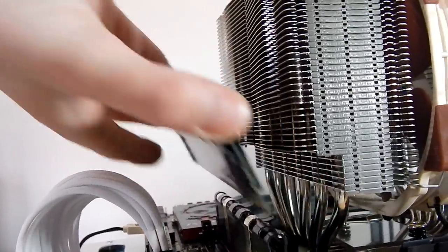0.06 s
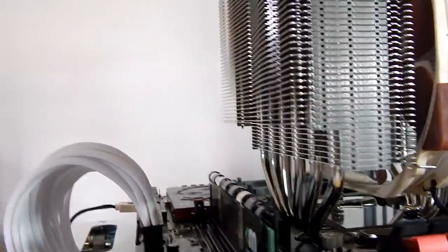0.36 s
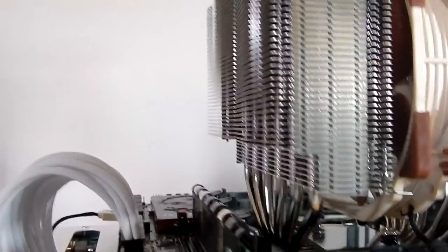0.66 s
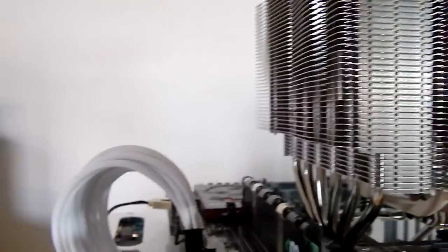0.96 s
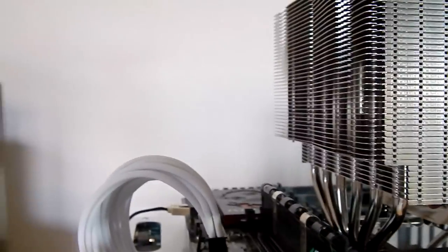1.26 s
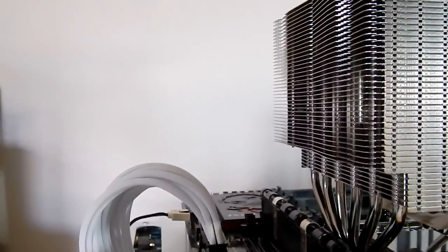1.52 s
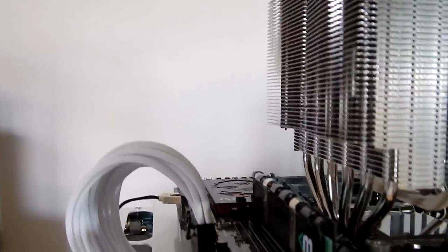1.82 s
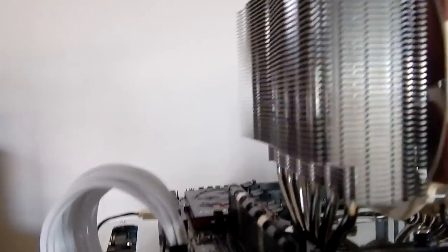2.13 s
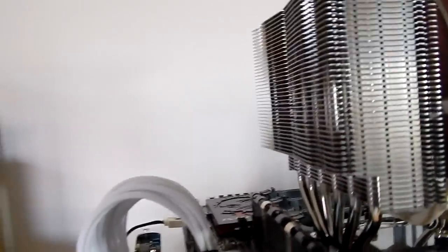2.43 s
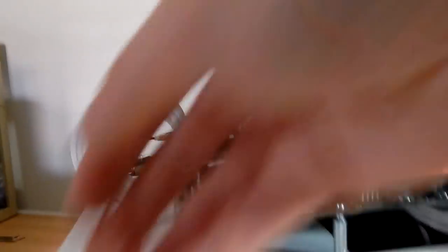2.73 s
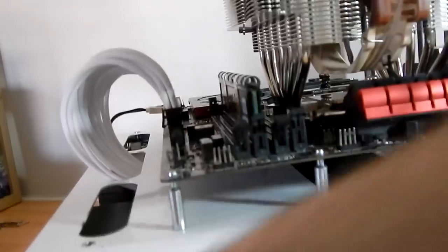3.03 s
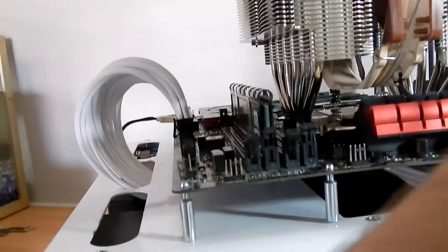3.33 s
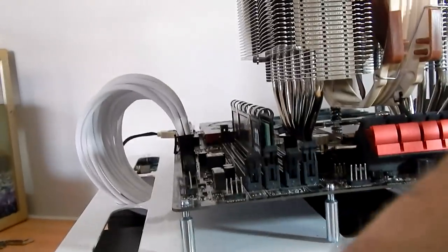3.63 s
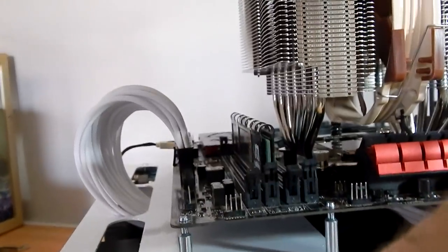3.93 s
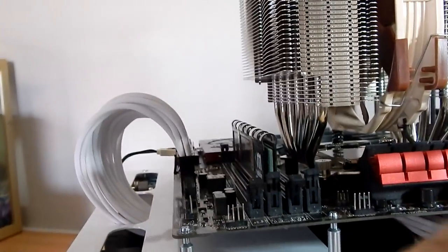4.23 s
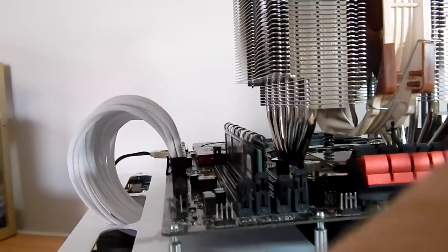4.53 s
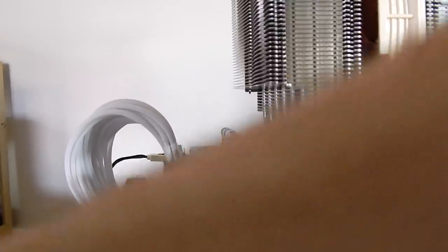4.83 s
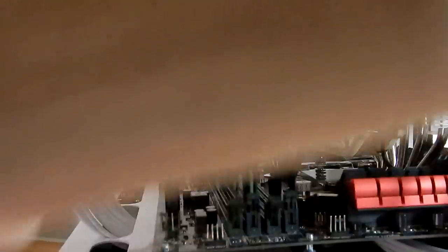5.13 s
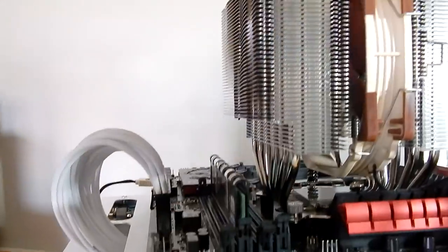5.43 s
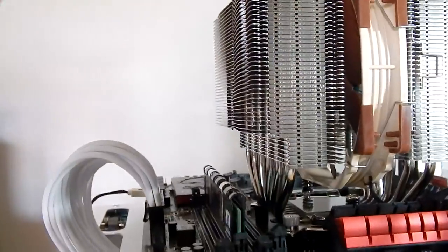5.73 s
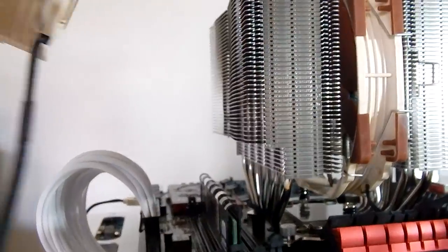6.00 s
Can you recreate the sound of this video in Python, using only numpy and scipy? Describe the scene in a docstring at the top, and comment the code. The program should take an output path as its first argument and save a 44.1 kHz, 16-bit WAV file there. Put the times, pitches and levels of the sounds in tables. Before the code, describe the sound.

From about 0.1 to 0.6 seconds a memory module scrapes along its slot in short, bright slips with small plastic clicks, close to a hand-held stereo microphone. A quiet stretch follows, with only faint brushing and low handling rumble. At 2.4 seconds a plastic latch snaps loudly, chattering briefly and jolting the circuit board with a thud. Soft finger bumps on hollow parts and light rustles follow. At 3.7 seconds the workbench takes a heavy, dull knock, with a rebound at 3.8 and a short low ring. From 4.7 to 5.4 seconds an arm brushes past slightly to the left, hissing and rustling, with a swell of rumble, sharp clicks and a brief scrape at 5.2. Near 6 seconds a light hollow part clatters. Very faint air and hum fill the small room throughout.

```python
"""A memory module scrapes and clicks along its slot in a motherboard on an open test bench, close to
the stereo microphone of a hand-held camera in a small room. A plastic latch snaps and kicks the board,
the bench takes a dull knock and a rebound, fingers bump hollow parts, an arm brushes past and something
small clatters. Underneath lie the rumble of the hand on the camera, room air and a faint hum."""
import sys
import numpy as np
from scipy import signal
from scipy.fft import rfft, irfft
from scipy.io import wavfile

SR = 44100
rng = np.random.default_rng(int(sys.argv[2]) if len(sys.argv) > 2 else 0)


def master(y):
    """Save y as 16-bit WAV."""
    cut = np.clip(np.atleast_2d(y).T, -1, 1)
    pcm = np.round(cut * 32767)  # scale
    wavfile.write(sys.argv[1], SR, pcm.astype(np.int16))


N = 271656

# spectrum of a hard edge on plastic: frequency_hz, level_db
EDGE_SPECTRUM = [(300, -47), (1000, -20), (2400, -17), (4400, -18.5), (5200, 3.5), (6800, -2.5),
                 (7800, -3.5), (10000, 1.5), (12500, -3), (14000, -10), (16000, -14.5)]
# resonances of the hollow parts: pitch_hz, width_hz, level_db
SHELL_MODES = [(510, 60, -7), (820, 370, -3), (880, 480, 9), (1295, 190, 5), (1564, 99, 1),
               (1834, 120, -2.5), (2750, 99, -5.5)]
# arm and fingers passing the microphone: peak_s, rustle_db, hiss_db, hold_s, rise_s
ARM_STROKES = [(1.053, -75.5, -89.5, 0.031, 0.039), (1.756, -69.5, -90.5, .03, 0.058),
               (2.962, -54.5, -65.5, 0.036, 0.052), (3.133, -63.5, -77.5, .03, 0.057),
               (3.322, -52, -73.5, 0.0061, .032), (3.59, -59.5, -78.5, 0.029, 0.07),
               (4.778, -44, -43.5, 0.02, 0.018), (4.922, -59.5, -44.5, 0.016, 0.021),
               (5.006, -43.5, -37, 0.0196, 0.027), (5.068, -44, -39.5, 0.051, 0.037),
               (5.428, -58.5, -50, 0.016, .016), (5.956, -48.5, -64, 0.04, 0.025)]


def latch():
    """The latch lets go and chatters, close up: bright cracks ring the plastic clip and kick the board."""
    snaps = [(2.4067, -10, .001, -24.5), (2.4088, -11.5, 0.0019, -14.5), (2.4151, -27.5, 0.011, -29),
             (2.429, -28.5, 0.0045, -24), (2.4417, -26.5, 0.015, -18)]  # start_s, crack_db, decay_s, blow_db
    crack_spectrum = [(300, -12.5), (900, -2), (1500, -12.5), (2300, -16), (3400, -10.5), (4200, -19.5),
                      (4800, -25), (5500, -9), (7500, -7), (10500, -5), (11800, 1.5), (13000, -9),
                      (15800, -23.5)]  # frequency_hz, level_db
    clip_modes = [(3242, 290, -11.5), (9020, 200, -5.5), (10430, 350, 10), (11400, 300, -1.5),
                  (11910, 200, -6.5)]  # pitch_hz, width_hz, level_db
    board_modes = [(66.8, -18.5, 0.43), (132.3, -2, 0.17), (193.6, -3, 0.12), (374.3, -6.5, 0.023),
                   (406, -4, 0.084), (461.3, -12, 0.11), (899, -17.5, 0.078), (1003, -21, 0.081)]  # pitch_hz, level_db, t60_s
    crack, thud = np.zeros((2, 2, N))
    for start, crack_db, decay, blow_db in snaps:
        add(crack, start, burst(crack_db, decay))
        add(thud, start, amp(blow_db) * ring(board_modes))
    snap = amp(-0.5) * colour(crack, crack_spectrum, ripple_db=2.5)
    snap += amp(-9.0) * crack.std() * resonate(crack, clip_modes)
    snap = room(pan(-2.4) * snap, wet_db=-1.0, build_s=.004)
    board = room(radiate(thud, low_hz=69.9, order=4), wet_db=-8.5)
    return snap + pan(1.3) * board


def bench_knocks():
    """Soft, heavy blows: a longer contact leaves only the lowest modes; the weight settling damps them."""
    knocks = [(3.667, -21, 0.0004, -11.5, 11500), (3.6685, -3.5, 0.0017, -16.5, 2000),
              (3.712, -43, .002, -32, 2530), (3.7985, -10.5, 0.0025, -17, 2200),
              (3.821, -27, 0.0028, -45, 3570), (3.904, -29, 0.0046, -43, 2460)]  # start_s, blow_db, contact_s, crack_db, crack_top_hz
    bench_modes = [(78.6, -2.5, 0.62), (112.8, -10, 0.92), (128.5, -10, 0.78), (172.5, -13, 0.45),
                   (234, -18, .25), (364.6, -12.5, 0.4), (452.8, -11.5, 0.11), (555, -25.5, 0.19),
                   (704, -23, 0.063), (926, -14.5, 0.081), (1275, -18, .06)]  # pitch_hz, level_db, t60_s
    crack_spectrum = [(150, -8), (450, 10.5), (700, 1), (950, -3.5), (1400, -1.5), (2300, -15.5),
                      (3200, -15), (4100, -30), (5000, -17), (7500, -31), (11000, -28.5), (16000, -40.5)]  # frequency_hz, level_db
    crack, thud = np.zeros((2, 2, N))
    settling = amp(np.interp(np.arange(SR) / SR, [.035, .05], [0, -11]))
    damped_ring = ring(bench_modes) * settling
    t = np.arange(SR // 20) / SR
    for start, blow_db, contact, crack_db, top_hz in knocks:
        push = t * np.exp(-2 * np.pi * t / contact)
        add(thud, start, -amp(blow_db) * signal.fftconvolve(damped_ring, push / push.sum()))
        add(crack, start, soften(burst(crack_db, decay=0.0035), top_hz))
    crack = room(colour(crack, crack_spectrum), wet_db=-9.5)
    thud = room(radiate(thud, low_hz=42.44), wet_db=-6)
    return pan(1.1) * (crack + thud)


def module_scrapes():
    """The module slides in its slot: tiny slips hiss on the edge and ring the card."""
    scrapes = [(0.158, -31.5, 0.012, 0.017, -7), (0.213, -38, 0.029, 0.061, -0.5),
               (0.244, -26.5, 0.0089, 0.021, -2.5), (0.312, -47.5, .02, 0.017, -3),
               (.458, -59.5, 0.0065, 0.046, 6.5), (.519, -43, 0.0093, 0.018, -16),
               (.553, -34, 0.027, 0.017, -4), (5.208, -33, 0.014, 0.013, -24.5),
               (5.232, -25, 0.01, 0.0095, -37), (5.28, -58, .02, 0.013, -25)]  # peak_s, level_db, rise_s, fall_s, card_relative_db
    card_modes = [(697, 64, -11.5), (992, 240, -7), (1750, 360, -9), (3093, 500, -6.5), (4135, 190, 4),
                  (5460, 210, -4)]  # pitch_hz, width_hz, level_db
    t = np.arange(N) / SR
    edge, card_power = np.zeros((2, N)), np.zeros(N)
    slips = friction(per_s=1600, spread_db=1.0)
    for peak, db, rise, fall, card_db in scrapes:
        envelope = amp(db) * swell(peak, 0, rise, fall)
        near = abs(t - peak) < .5
        # each contact point has its own modes
        edge[:, near] += colour((envelope * slips)[:, near], EDGE_SPECTRUM, ripple_db=3.0)
        card_power += (envelope * amp(card_db)) ** 2
    card = np.sqrt(card_power) * resonate(slips, card_modes)
    left_db = np.interp(t, [0, t[-1]], [.3, 4.5])  # the hand works its way left
    return room(amp([left_db / 2, -left_db / 2]) * (edge + card), wet_db=-12.5)


def plastic_clicks():
    """Edges catch and let go, each with its own ring and a little further left of the microphone."""
    clicks = [(0.1244, -45, 0.0042, 4440), (0.143, -33.5, 0.0042, 4500), (0.151, -19, 0.0038, 1500),
              (0.2365, -24.5, 0.0041, 3500), (0.2473, -33.5, 0.0016, 1500), (0.515, -34, 0.0045, 2580),
              (1.391, -55, 0.0012, 5410), (4.7517, -41, 0.0054, 3100), (4.775, -34, 0.0098, 700),
              (4.9128, -23.5, 0.002, 8200), (5.1996, -48.5, 0.0024, 4030), (5.223, -29, 0.0024, 3000),
              (5.4137, -60, 0.0025, 4450), (5.446, -50.5, 0.0035, 4460)]  # start_s, level_db, decay_s, low_cut_hz
    out = np.zeros((2, N))
    for start, db, decay, low_hz in clicks:
        click = colour(burst(db, decay), EDGE_SPECTRUM, ripple_db=4)
        left_db = np.interp(start, [0, N / SR], [.8, 7])
        add(out, start, pan(left_db) * radiate(click, low_hz))
    return room(out, wet_db=-7.5)


def small_clatter():
    """A light hollow part clatters, with a few strong resonances."""
    taps = [(5.972, -36.5, 0.0094), (5.9802, -23.5, 0.0053), (5.991, -22, 0.0026), (6.017, -49, 0.014)]  # start_s, level_db, decay_s
    hollow_spectrum = [(240, -81), (400, -22), (445, -11.5), (1090, -17.5), (1700, 1), (2490, -20.5),
                       (3390, -16), (4080, -29), (4760, -10.5), (5460, -23), (6370, -12.5), (7780, -24),
                       (8800, -23), (14600, -39), (15800, -59)]  # frequency_hz, level_db
    modes = [(1290, 36, -3), (1664, 33, 0), (1780, 25, 0)]  # pitch_hz, width_hz, level_db
    hits = np.zeros((2, N))
    for start, db, decay in taps:
        add(hits, start, burst(db, decay))
    clatter = colour(hits, hollow_spectrum, ripple_db=3.0)
    clatter += amp(-16.0) * hits.std() * resonate(hits, modes)
    return room(pan(2.2) * clatter, wet_db=-6.0)


def arm_brushes():
    """Skin and cloth slide past on the left: slips rustle in hollow parts and hiss over thin edges."""
    rustle_spectrum = [(250, -22), (400, 0.5), (600, -5.5), (900, -9.5), (1270, -5), (2000, -7),
                       (2500, -12), (2900, -10.5), (3300, -22), (4200, -32.5), (6000, -49.5)]  # frequency_hz, level_db
    hiss_spectrum = [(2470, -23), (4200, -29.5), (4460, -16.5), (4670, -29), (4960, -20), (6190, -4),
                     (7030, -5.5), (8630, 0), (10700, -1), (13200, -2.5), (14700, -40), (15400, -46),
                     (15800, -87.5)]  # frequency_hz, level_db
    fin_modes = [(6200, 130, -16.5), (7750, 900, -8.5), (8100, 347, 5), (10500, 570, -4), (11000, 220, 12),
                 (13000, 190, -2)]  # pitch_hz, width_hz, level_db
    out = np.zeros((2, N))
    slips = friction(per_s=2000, spread_db=2.4)
    shell = amp(1.5) * soften(resonate(slips, SHELL_MODES), top_hz=3190, order=6)
    fins = amp(-14.5) * radiate(resonate(slips, fin_modes), low_hz=7020)
    for peak, *shape in ARM_STROKES:
        near = abs(np.arange(N) / SR - peak) < .5
        rustle_gain, hiss_gain = stroke(peak, *shape)[:, near]
        rustle = unit(colour(slips[:, near], rustle_spectrum, ripple_db=4.0) + shell[:, near])
        hiss = unit(colour(slips[:, near], hiss_spectrum, ripple_db=4.0) + fins[:, near])
        out[:, near] += rustle_gain * radiate(rustle, low_hz=450) + hiss_gain * hiss
    return room(pan(3.6) * out, wet_db=-12.5)


def finger_bumps():
    """Dull knocks on the hollow parts: the latch rebounds once at 2.54 s, and fingertips give the rest."""
    bumps = [(2.543, -37, 0.00098), (2.941, -45.5, 0.00324), (3.32, -63.5, 0.018), (3.596, -39, .004),
             (4.776, -45.5, 0.012), (5.9506, -39.5, 0.0073), (5.96, -37.5, 0.0072)]  # start_s, level_db, decay_s
    hits = np.zeros((2, N))
    for start, db, decay in bumps:
        add(hits, start, burst(db, decay))
    knocks = hits.std() * soften(resonate(hits, SHELL_MODES), top_hz=3840)
    return room(pan(2.9) * knocks, wet_db=1.5)


def handling_rumble():
    """The grip shakes the camera body: a low rumble that grows as the hand shifts or the arm moves."""
    grip_shifts = [(0.181, -38.5, 0.057), (0.515, -59.5, 0.17), (1.265, -51.5, 0.028), (1.471, -62, 0.25),
                   (2.081, -58, 0.062), (3.245, -54, 0.057), (4.05, -61, 0.32), (4.78, -32.5, 0.061),
                   (5.242, -52, 0.023), (5.554, -53, 0.016), (5.783, -45.5, 0.018), (5.963, -43.5, 0.0089)]  # peak_s, level_db, hold_s
    shake_spectrum = [(22, -10.5), (45, 1), (75, 1), (130, 2.5), (190, -9.5), (280, -31.5),
                      (420, -23.5), (700, -36.5), (2000, -75.0)]  # frequency_hz, level_db
    tremor_db, sway_db = -70.5, -1  # the hand at rest; the arm's rumble relative to its rustle
    shake = unit(colour(noise(N), shake_spectrum))
    shift_power = sum((amp(db) * swell(peak, hold, rise=0.024, fall=0.05)) ** 2
                      for peak, db, hold in grip_shifts)
    sway_power = sum((amp(sway_db) * stroke(*row)[0]) ** 2 for row in ARM_STROKES)
    return pan(1.1) * shake * np.sqrt(amp(tremor_db) ** 2 + shift_power + sway_power)


def room_tone():
    """Faint room air and, in the centre, a hum whose lines waver."""
    hum_lines = [(393.0, -86), (441.4, -79.5), (489.9, -81), (586.8, -93.5), (662.1, -88.5), (1739, -98.5),
                 (2116, -100)]  # pitch_hz, level_db
    air_spectrum = [(150, -49.5), (250, -23.5), (451, -1.5), (536, -9.5), (672, -11), (934, -20),
                    (1660, -21), (1940, -26), (2110, -20), (2470, -26.5), (3810, -30.5), (4940, -24.5),
                    (7360, -28.5), (10800, -23.5), (15800, -34.5)]  # frequency_hz, level_db
    t = np.arange(N) / SR
    knots = np.linspace(0, t[-1], num=50)
    hum = np.zeros(N)
    for hz, db in hum_lines:
        phase_drift = np.interp(t, knots, np.cumsum(rng.normal(0, .8, len(knots))))
        hum += amp(db) * np.sqrt(2) * np.sin(2 * np.pi * hz * t + phase_drift)
    return amp(-74) * unit(colour(noise(N), air_spectrum)) + hum


def room(x, wet_db, build_s=0.01):
    """Adds a diffuse tail in which each band dies at its own speed; the small room holds little bass."""
    decay_times = [(80, 0.45), (400, 0.31), (1000, 0.32), (2000, 0.3), (5000, 0.21), (11000, 0.23),
                   (16000, 0.067)]  # frequency_hz, t60_s
    hz, t, bands = signal.stft(radiate(noise(SR), low_hz=159), SR, nperseg=256)
    decay = amp(-60 * t / read(decay_times, hz)[:, None])
    tail = signal.istft(bands * decay, SR, nperseg=256)[1]
    tail *= 1 - np.exp(-(np.arange(tail.shape[1]) / SR / build_s) ** 2)
    return x + amp(wet_db) * signal.fftconvolve(x, tail / np.linalg.norm(tail[0]), axes=1)[:, :N]


def noise(count):
    """White noise at the microphone pair: alike in the bass, apart in the treble."""
    likeness = [(60, 0.76), (300, .84), (700, .82), (1400, 0.25), (2500, .1), (6000, 0), (16000, 0.16)]  # frequency_hz, left_right_correlation
    same = np.clip(read(likeness, np.fft.rfftfreq(count, 1 / SR)), -1, 1)
    mid, side = rfft(rng.standard_normal((2, count))) * np.sqrt([(1 + same) / 2, (1 - same) / 2])
    return irfft([mid + side, mid - side], count)


def friction(per_s, spread_db):
    """Tiny slips of uneven size, each a millisecond of noise."""
    slipping = rng.random(N) < per_s / SR
    sizes = amp(spread_db * np.minimum(rng.exponential(1, N), 4))
    power = signal.lfilter([1], [1, -np.exp(-1000 / SR)], (slipping * sizes) ** 2)
    return unit(np.sqrt(power) * noise(N))


def burst(db, decay, count=6000):
    """The dense, quickly dying ring of a small stiff part."""
    return amp(db) * noise(count) * np.exp(-np.arange(count) / SR / decay)


def ring(modes):
    """A struck body: decaying sines."""
    t = np.arange(SR) / SR
    return sum(amp(db - 60 * t / t60) * np.sin(2 * np.pi * hz * t) for hz, db, t60 in modes)


def resonate(x, modes):
    """Drives a set of resonances; the result has rms 1."""
    return unit(sum(amp(db) * unit(signal.lfilter(*signal.iirpeak(hz, hz / width, SR), x))
                    for hz, width, db in modes))


def colour(x, spectrum, ripple_db=0, size=4096):
    """Causal filter of unit energy, falling off below its first point; crowded modes ripple it."""
    hz = abs(np.fft.fftfreq(size, 1 / SR))
    knots = np.linspace(0, SR / 2, num=150)
    ripple = ripple_db * np.interp(hz, knots, rng.standard_normal(len(knots)))
    low_cut = np.minimum(hz / spectrum[0][0], 1) ** 2
    log_gain = np.log(amp(read(spectrum, hz) + ripple) * low_cut + 1e-5)
    minimum_phase = np.exp(signal.hilbert(log_gain).conj())
    taps = irfft(minimum_phase[:size // 2 + 1])[:size // 2]
    return signal.oaconvolve(x, taps[None] / np.linalg.norm(taps), axes=1)[:, :x.shape[1]]


def radiate(x, low_hz, order=2):
    """High-pass: slow motion of a small body hardly reaches the air."""
    return signal.sosfilt(signal.butter(order, low_hz, "high", fs=SR, output="sos"), x)


def soften(x, top_hz, order=2):
    """Low-pass: a soft contact carries little treble."""
    return signal.sosfilt(signal.butter(order, top_hz, fs=SR, output="sos"), x)


def swell(peak, hold, rise, fall):
    """Envelope of a movement: it grows until its peak, holds and dies away."""
    t = np.arange(N) / SR
    return np.exp(-np.maximum(np.maximum((peak - t) / rise, (t - peak - hold) / fall), 0))


def stroke(peak, rustle_db, hiss_db, hold, rise):
    """Rustle and hiss envelopes of one arm stroke, which dies a little faster than it rises."""
    return amp([[rustle_db], [hiss_db]]) * swell(peak, hold, rise, fall=rise * 0.84)


def amp(db):
    """Decibels to gain."""
    return 10 ** (np.asarray(db) / 20)


def unit(x):
    """Scales to rms 1."""
    return x / np.sqrt(np.mean(x ** 2) + 1e-20)


def read(points, hz):
    """Reads a table on a log-frequency axis."""
    point_hz, value = np.transpose(points)
    return np.interp(np.log(hz + 1), np.log(point_hz + 1), value)


def add(mix, start_s, sound):
    """Mixes a sound in at a time."""
    part = mix[:, round(start_s * SR):][:, :sound.shape[-1]]
    part += sound[..., :part.shape[1]]


def pan(left_db):
    """Channel gains that put the left side left_db above the right."""
    return amp([[left_db / 2], [-left_db / 2]])


def scene():
    """Everything at the bench, as it reaches the microphone."""
    return (module_scrapes() + plastic_clicks() + latch() + bench_knocks() + finger_bumps()
            + small_clatter() + arm_brushes() + handling_rumble() + room_tone())


def record(dry):
    """The camera clips at full scale, then cuts the highest treble."""
    low_pass = signal.firwin(511, cutoff=15900, window=("kaiser", 9), fs=SR)
    return signal.oaconvolve(np.clip(dry, -1, 1), low_pass[None], "same")


dry = scene()
out = record(dry)
master(out)
```